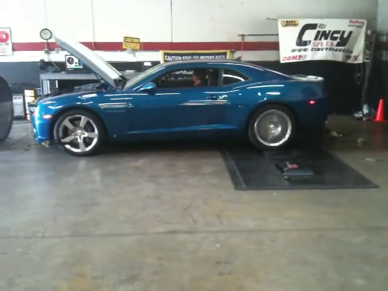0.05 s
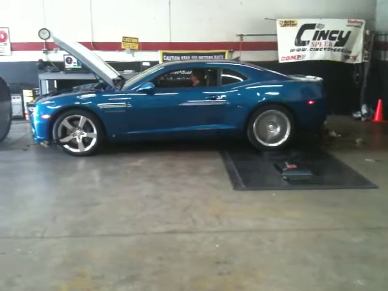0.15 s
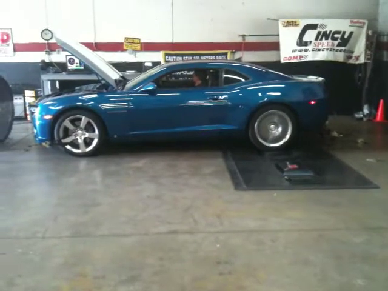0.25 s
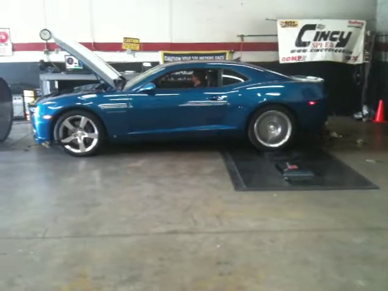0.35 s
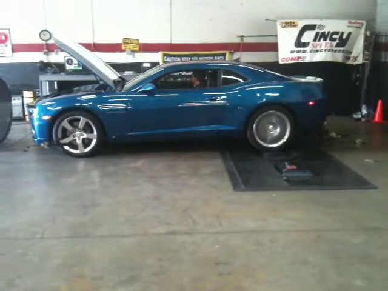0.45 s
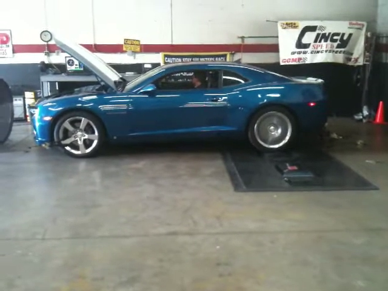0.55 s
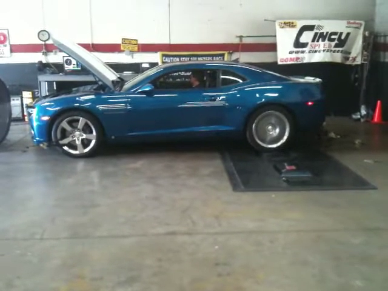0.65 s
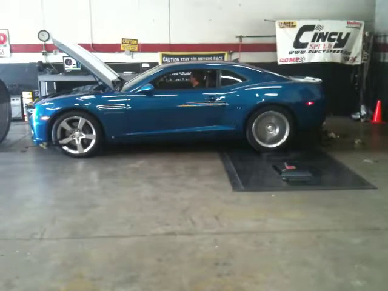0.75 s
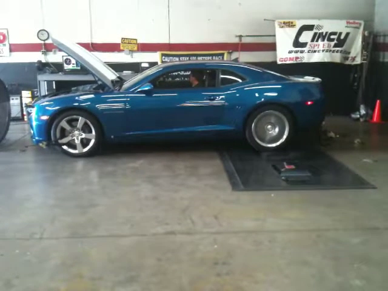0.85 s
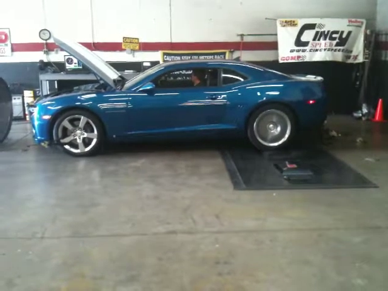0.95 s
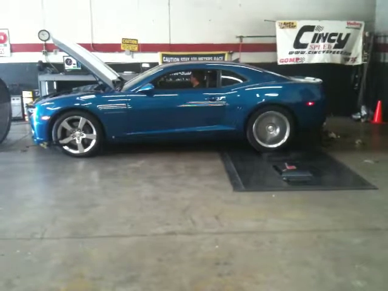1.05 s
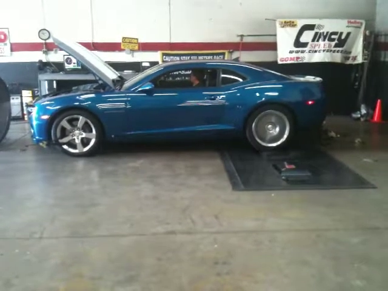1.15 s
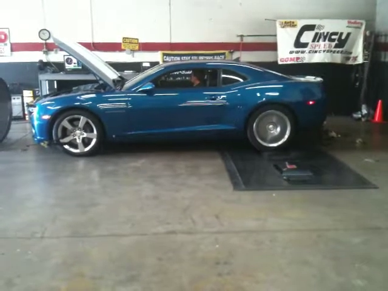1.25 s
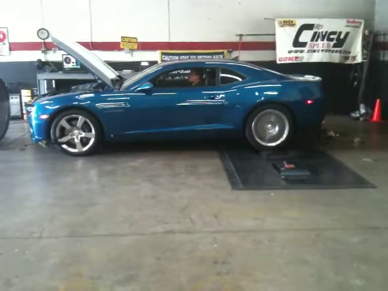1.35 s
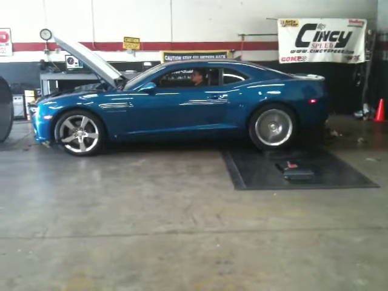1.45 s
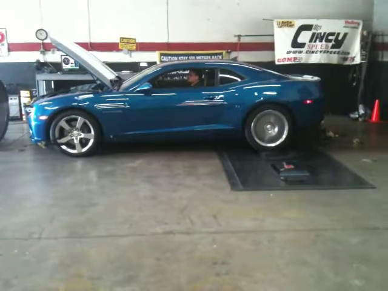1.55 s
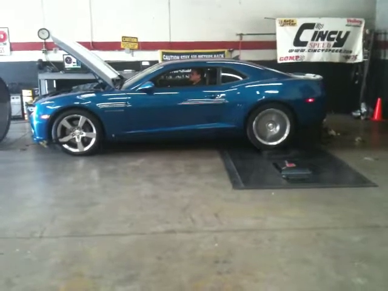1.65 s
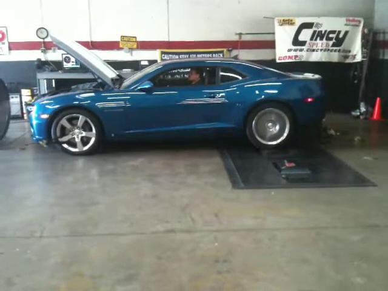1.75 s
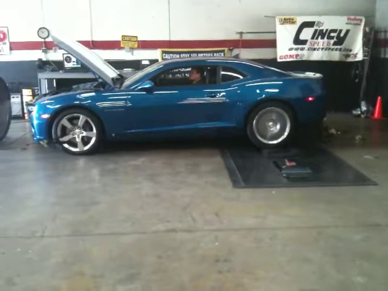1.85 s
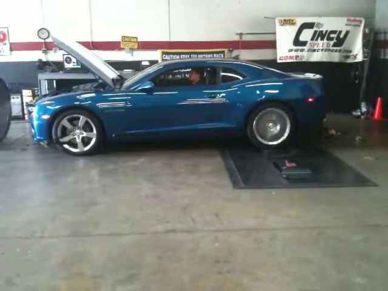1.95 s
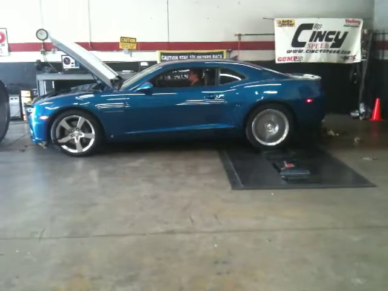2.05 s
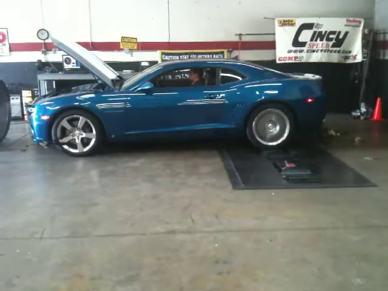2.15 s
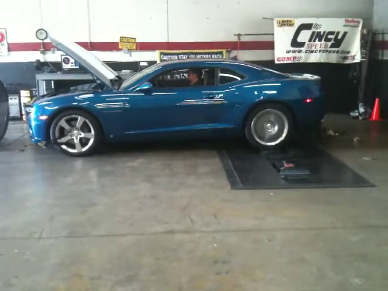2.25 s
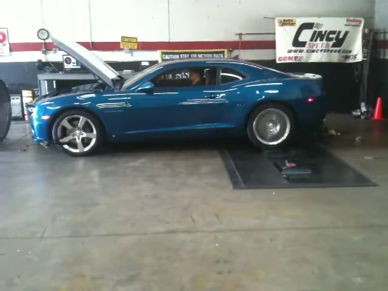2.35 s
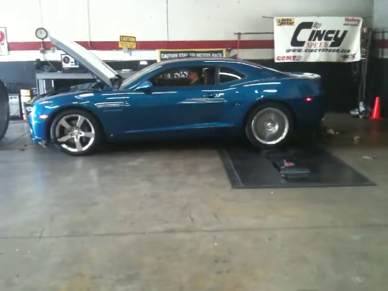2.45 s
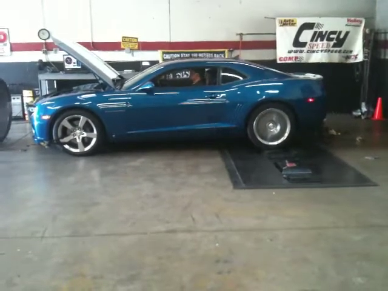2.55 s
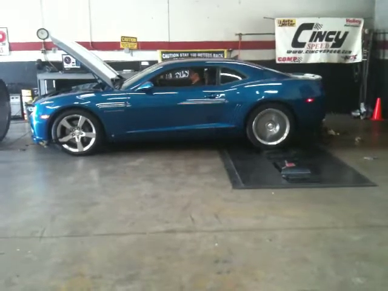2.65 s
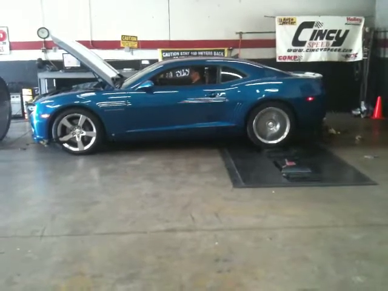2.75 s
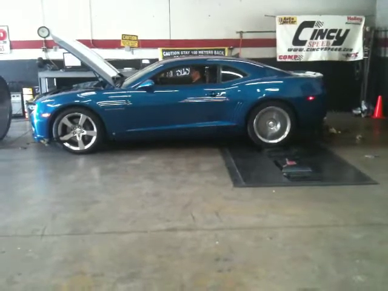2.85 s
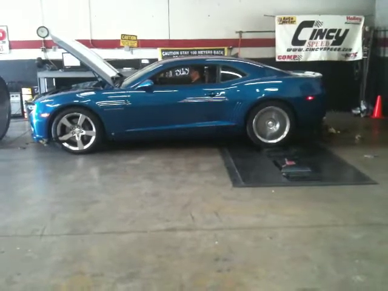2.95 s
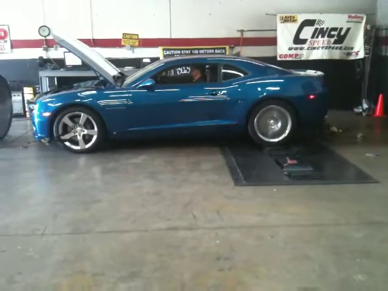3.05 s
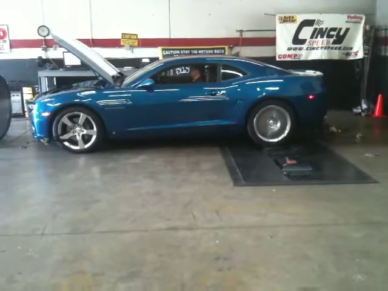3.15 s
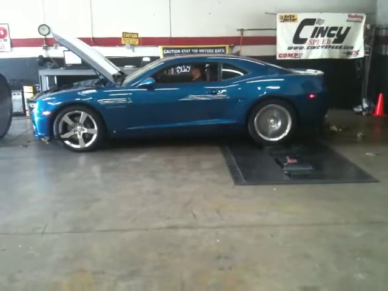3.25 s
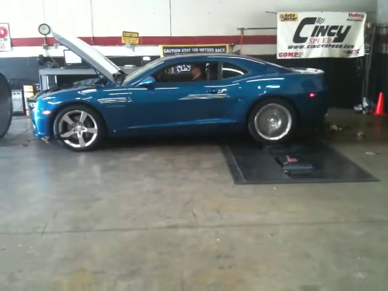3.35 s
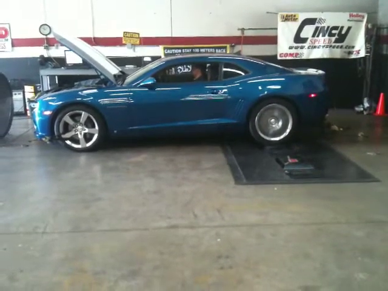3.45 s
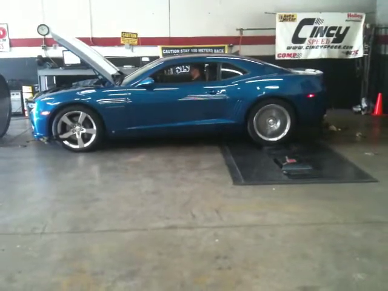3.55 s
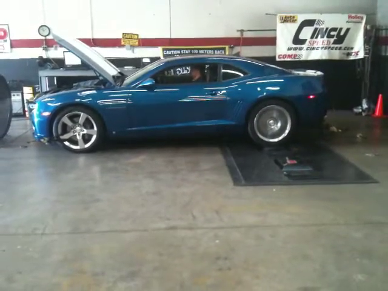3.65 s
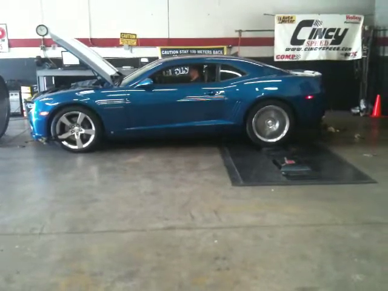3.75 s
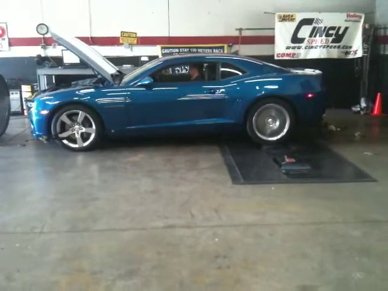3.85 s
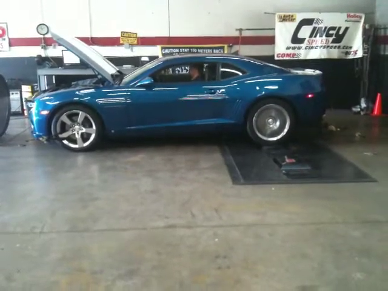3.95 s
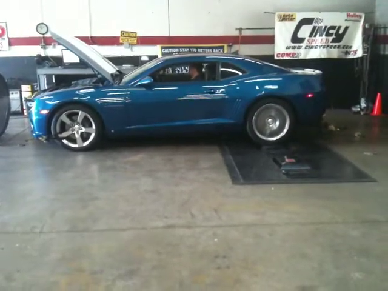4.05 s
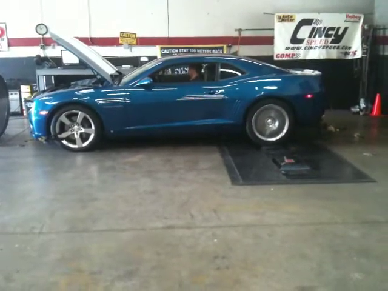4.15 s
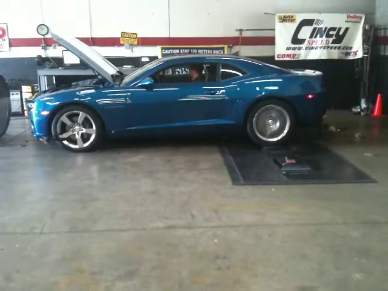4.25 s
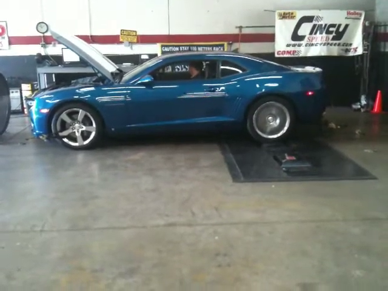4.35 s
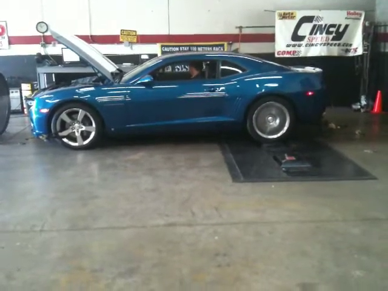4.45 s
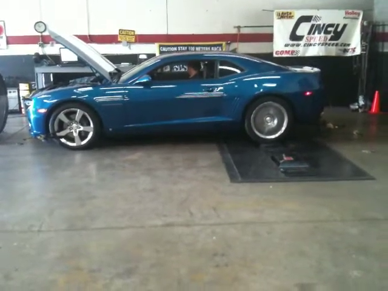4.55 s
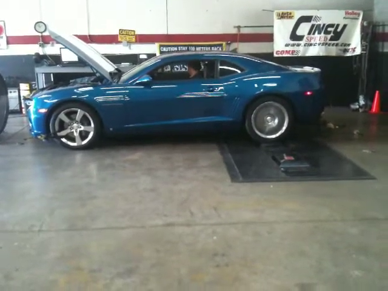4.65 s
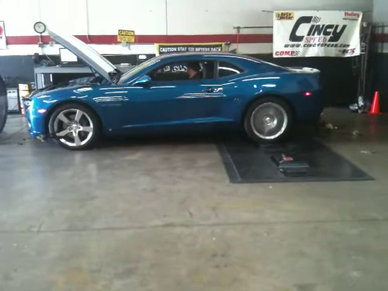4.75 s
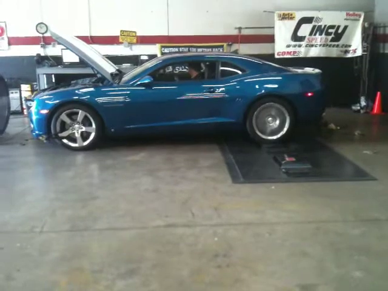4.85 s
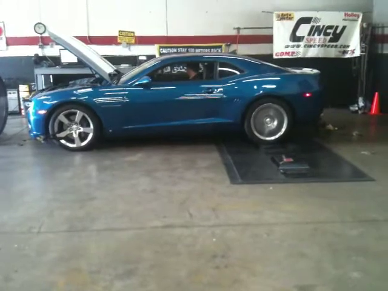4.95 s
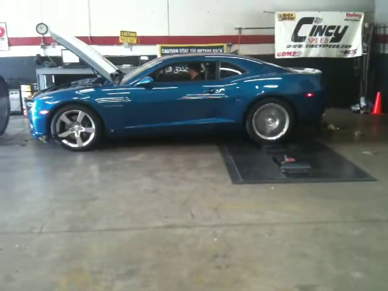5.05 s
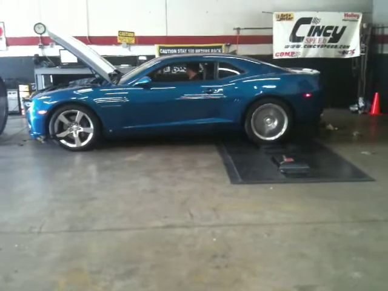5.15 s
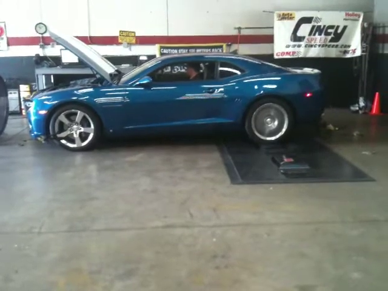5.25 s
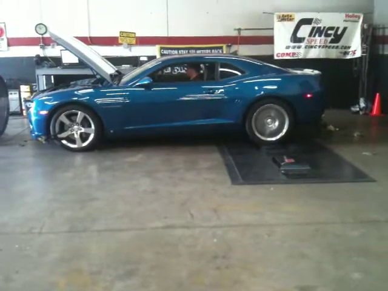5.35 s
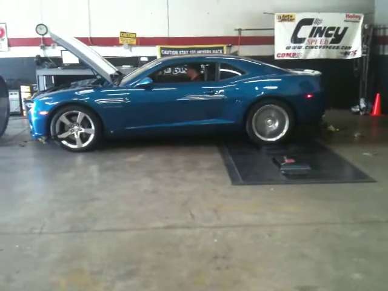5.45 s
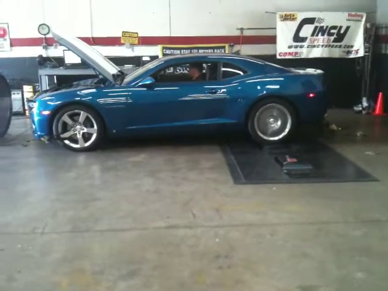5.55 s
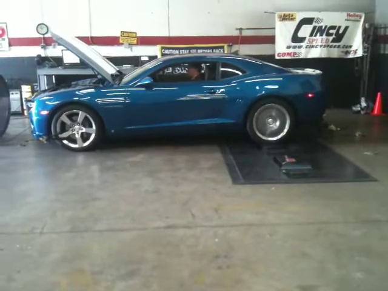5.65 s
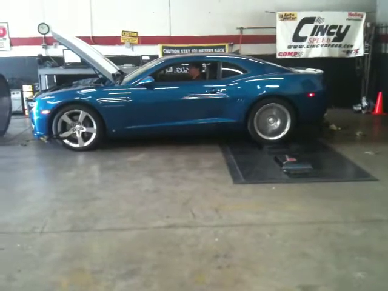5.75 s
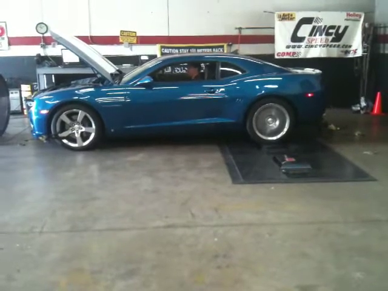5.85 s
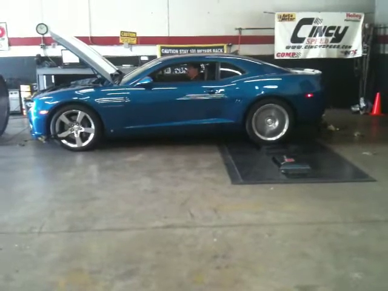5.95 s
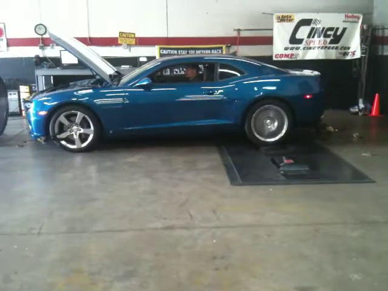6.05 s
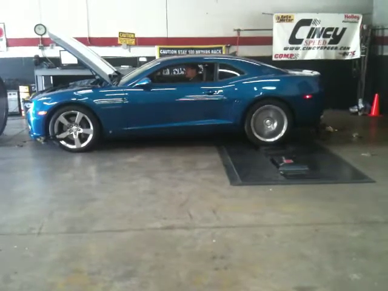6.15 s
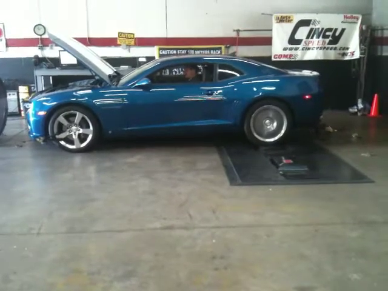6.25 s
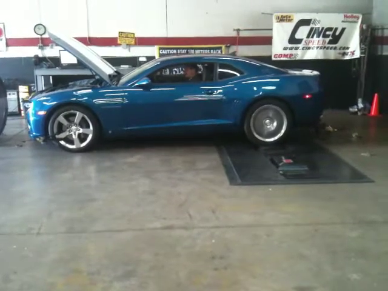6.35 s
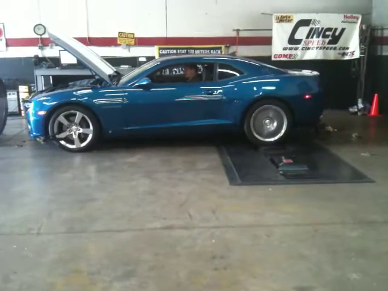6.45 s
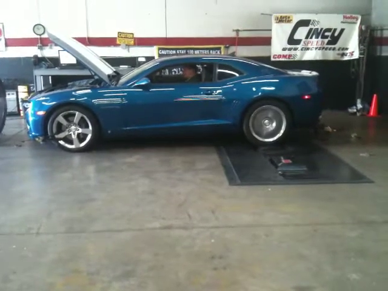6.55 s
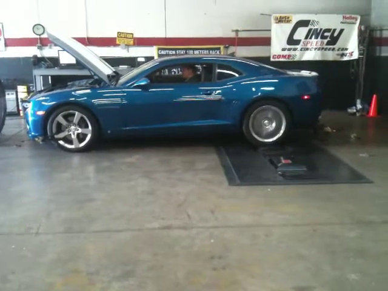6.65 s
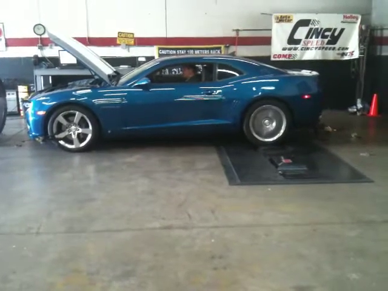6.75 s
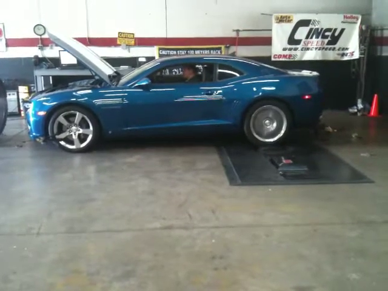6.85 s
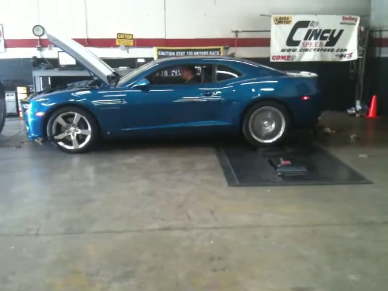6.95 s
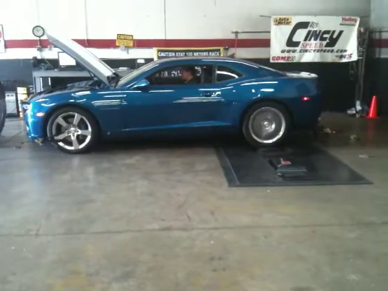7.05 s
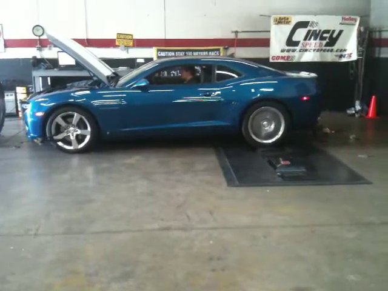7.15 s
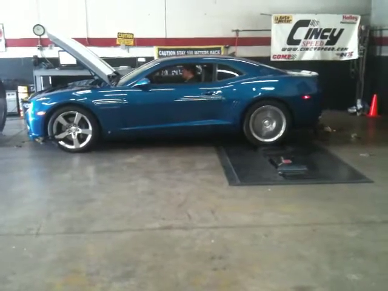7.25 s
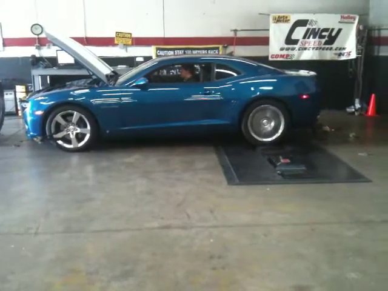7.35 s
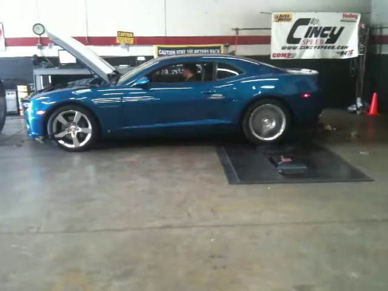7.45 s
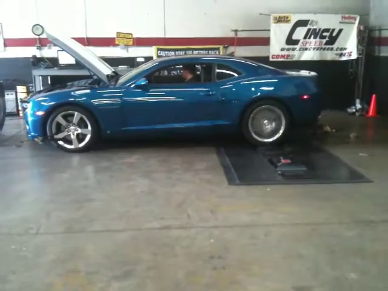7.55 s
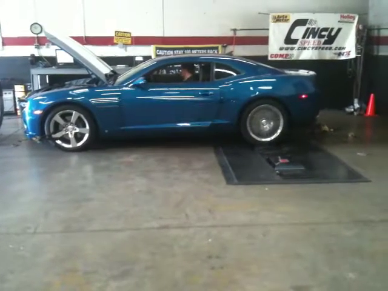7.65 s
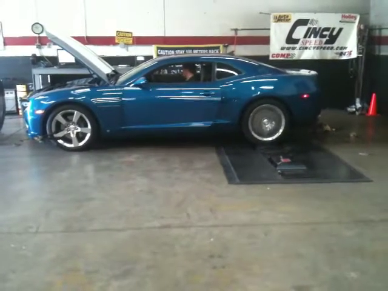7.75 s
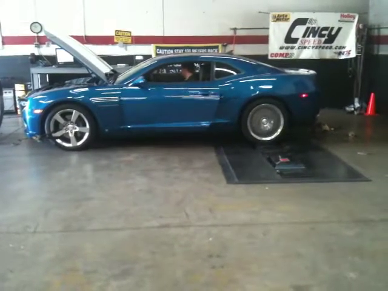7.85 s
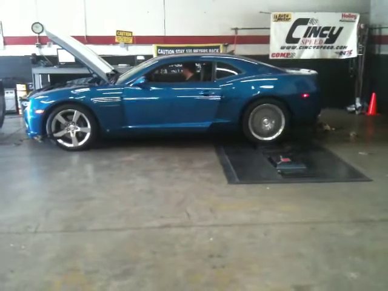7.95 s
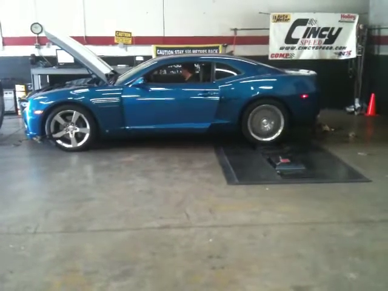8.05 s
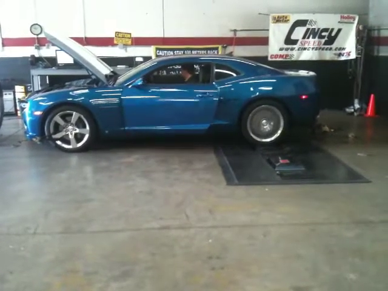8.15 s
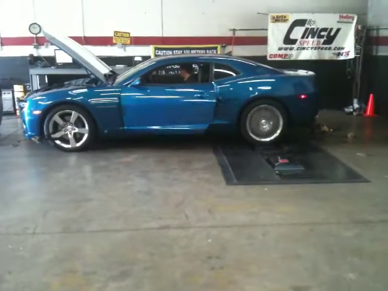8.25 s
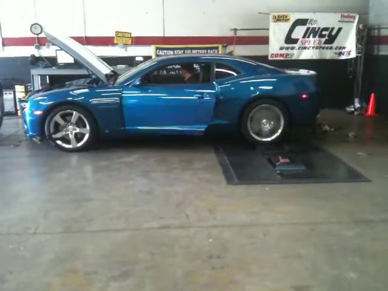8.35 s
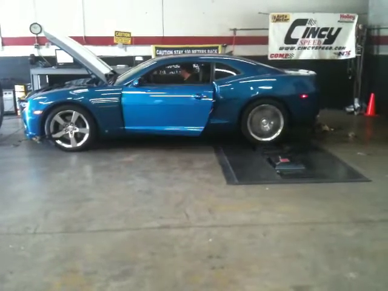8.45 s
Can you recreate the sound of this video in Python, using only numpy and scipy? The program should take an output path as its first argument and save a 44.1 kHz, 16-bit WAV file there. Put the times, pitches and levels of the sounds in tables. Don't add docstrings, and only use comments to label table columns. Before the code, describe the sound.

A V8 car roars at full revs on a workshop roller, the throttle pops shut, and whining tyres and drum slow down to a rough idle.

```python
import sys
import numpy as np
from scipy import signal
from scipy.fft import rfft, irfft, dct
from scipy.io import wavfile
from scipy.ndimage import uniform_filter1d

SR = 44100
rng = np.random.default_rng(int(sys.argv[2]) if len(sys.argv) > 2 else 0)


def rack_gain(trim_db):
    fader = np.asarray(trim_db, float)
    return 10 ** (fader / 20)


def put_to_file(sound):
    columns = np.atleast_2d(sound).T
    safe = np.clip(columns, -1, 1)
    whole_steps = np.round(safe * 32767)
    wavfile.write(sys.argv[1], SR, whole_steps.astype(np.int16))


N = 374850
TIME = np.arange(N) / SR
FULL_DRUM_HZ, FULL_CYCLE_HZ = 9000, 54


def unit(x):
    return x / np.sqrt(np.mean(x ** 2))


def curves(table):
    s, *columns = np.transpose(table)
    return [np.interp(TIME, s, c) for c in columns]


def shaped(x, gain):
    return irfft(rfft(x) * gain(np.arange(len(x) // 2 + 1) * SR / len(x) + 1), len(x))


def wander(steps):
    count = int(steps[-1]) + 2
    return np.interp(steps, np.arange(count), rng.standard_normal(count))


def resonances(f, table):
    return 1 + sum(rack_gain(db) / (1 + ((f - centre) / width) ** 2) for centre, width, db in table)


def after_shut(fall_s):
    shut_s = 1.44
    return np.exp(-np.clip(TIME - shut_s, 0, None) / fall_s)


def band(turns, hz, multiple, width):
    angle = 2 * np.pi * multiple * turns
    sound = wander(width * turns) * np.sin(angle) + wander(width * turns) * np.cos(angle)
    return unit(sound) * (multiple * hz < 17000)


def whine(turns, hz, multiple):
    tremble = 1.5 * wander(.03 * turns)
    swell = 1 + .3 * wander(90 * TIME)
    return unit(swell * np.sin(2 * np.pi * multiple * turns + tremble)) * (multiple * hz < 19000)


def shop(x):
    t60_s, tail_db = 0.97, -1.5
    t = TIME[:SR]
    low = shaped(rng.standard_normal(SR), lambda f: 1 / np.hypot(1, f / 3000))
    tail = low * rack_gain(-60 * t / t60_s)
    tail += 0.7 * rng.standard_normal(SR) * rack_gain(-60 * t / (0.47 * t60_s))
    tail *= np.clip(t / 0.0086, 0, 1)
    tail /= np.sqrt(np.sum(tail ** 2))
    lead = np.concatenate([x[SR // 2:0:-1], x])
    return x + rack_gain(tail_db) * signal.fftconvolve(lead, tail)[SR // 2:SR // 2 + N]


# (time [s], ridges passing [Hz])
DRUM = [
    (0, 8335),
    (.4, 8600),
    (1.5, 9096),
    (2.1, 9060),
    (2.4, 8850),
    (3, 8180),
    (3.4, 7700),
    (5, 5800),
    (8.5, 1419),
]


def drum():
    hz, = curves(DRUM)
    return hz, np.cumsum(hz) / SR


# (time [s], four-stroke cycle [Hz])
CYCLE = [(0, 50.4), (.35, 51.2), (1.38, 54.3), (1.46, 54.0), (1.65, 51.0), (2.14, 42.7), (2.69, 34.6),
         (2.92, 31.6), (3.4, 26.5), (4.36, 18.3), (4.75, 15.5), (5.1, 13.4), (5.6, 11.8), (6.5, 11),
         (8.5, 10.8)]


def engine_speed():
    return curves(CYCLE)[0]


# (frequency [Hz], level [dB per Hz])
ROAR_COLOUR = [(24, -51), (40, -33), (87, -18), (166, -6), (268, -4.5), (420, -11), (596, -6), (1230, -2),
               (1620, 2), (2300, -4.5), (2670, -1.5), (4300, 1), (7460, -4), (14300, -15.5), (15800, -18.5)]
# (level at speed [dB], drum rate under which it sinks [Hz],
# slope [dB per octave of speed], change while driven [dB], least level [dB])
ROAR_RANGES = [
    (-19, 11000, 4.5, 2.1, -48),
    (-14.5, 6560, 12, -0.5, -54),
    (-12.5, 7670, 17, -3.5, -41.5),
    (-18, 9800, 7.5, 1.3, -43),
    (-20.5, 8000, 11, -.4, -64),
]


def roar(drum_hz, turns):
    hz, db = np.transpose(ROAR_COLOUR)
    edges = [1, 900, 3500, 7500, 11500, SR]
    out, swell = 0, wander(20 * TIME)
    load = after_shut(0.22)
    revs_db = 4 * np.log2(engine_speed() / FULL_CYCLE_HZ)
    for low, high, (top_db, knee_hz, slope_db, load_db, least_db) in zip(edges, edges[1:], ROAR_RANGES):
        level_db = top_db + slope_db * np.minimum(np.log2(drum_hz / knee_hz), 0) + load_db * load
        gain = np.hypot(rack_gain(level_db + revs_db * (low == 1)), rack_gain(least_db))

        def colour(f):
            edge = np.sqrt((1 + (low / f) ** 8) * (1 + (f / high) ** 8))
            return rack_gain(np.interp(np.log(f), np.log(hz), db)) / edge

        noise = shaped(rng.standard_normal(N), colour)
        out = out + unit(noise) * gain * rack_gain(0.4 * swell + 0.72 * wander(18 * TIME))
    valley = 0
    for wave in (np.sin(2 * np.pi * .2 * turns), np.cos(2 * np.pi * .2 * turns)):
        valley = valley + 2 * wave * uniform_filter1d(uniform_filter1d(out * wave, size=90), size=90)
    return out - 0.46 * valley


# (start [s], end [s], pitch [Hz], width [Hz], level [dB])
BRAKE = [
    (1.6, 2.7, 4170, 160, -27),
    (2.3, 3.08, 5170, 200, -24),
]


def brake():
    out = 0
    for start, end, hz, width, db in BRAKE:
        held = np.clip(np.minimum((TIME - start) / .03, (end - TIME) / 0.036), 0, 1)
        out = out + held * rack_gain(db + 2.1 * wander(12 * TIME)) * band(TIME, 1, hz, width)
    return out


# (frequency [Hz], width [log Hz], gain [dB])
HORN = [(1646, 0.19, 6.5), (2570, 0.18, 3), (4200, 0.19, 4.5), (5200, 0.066, 9)]


def horn(f):
    db = sum(top * np.exp(-(np.log(f / hz) / width) ** 2) for hz, width, top in HORN)
    return rack_gain(db - 4.5) / np.hypot(1, (1000 / f) ** 2)


# (multiple of the ridge rate, level [dB])
TREAD = [(.17, -17), (.225, -6), (.245, -1.5), (.27, 0.5), (.29, -3.5), (.31, 2.5), (.335, -4), (.46, -4.5),
         (.49, -6), (.55, -10.5), (.59, -8.5), (.62, -5), (.65, -3.5), (.82, -5.5)]


def tread_song(hz, turns, load):
    level_db = -11 + 12 * np.log2(hz / FULL_DRUM_HZ) - 4.5 * load
    level_db = level_db - 20 * np.clip(4 * (1 - hz / 1800), 0, 1)
    song = sum(rack_gain(db) * band(turns, hz, k, max(.018, .045 * k)) for k, db in TREAD)
    return shaped(rack_gain(level_db) * unit(song), horn)


# (frequency [Hz], level [dB])
RIDGE_COLOUR = [(2700, -47), (3600, -42), (4800, -31), (7000, -24), (9700, -20.5), (11000, -25.5),
                (15000, -27.5), (17000, -31)]
# (multiple of the ridge rate, level under that octave [dB])
BEATS = [(1.3, -13), (1.69, -12), (1.85, -12), (2.14, -15), (2.3, -7.5), (2.45, -13)]
# (multiple of the ridge rate, level [dB])
UPPER = [(2.68, -7), (3.15, -8), (3.3, -6), (4, -8), (4.3, -10)]


def ridge_whine(hz, turns, load):
    beat_width = .1
    pitch, colour_db = np.transpose(RIDGE_COLOUR)

    def radiated(k):
        return rack_gain(np.interp(np.log(k * hz), np.log(pitch), colour_db))

    ridge = radiated(1) * whine(turns, hz, 1.005)
    octave = radiated(1.98) * whine(turns, hz, 2)
    octave = octave + sum(rack_gain(db) * radiated(k) * band(turns, hz, k, beat_width) for k, db in BEATS)
    third = whine(turns, hz, 3) * (3 * hz < 17000) * (hz / FULL_DRUM_HZ * 1.9)
    upper = third + sum(rack_gain(db) * band(turns, hz, k, beat_width) for k, db in UPPER)
    upper_db = -8 - 26.5 + 6 * np.log2(hz / 4300)
    return rack_gain(0.3 - 8.5 * load) * ridge + rack_gain(-1.35) * octave + rack_gain(upper_db) * upper


def tyres(hz, turns):
    load = after_shut(0.22)
    patchy = rack_gain(1.2 * wander(24 * TIME))
    return patchy * (tread_song(hz, turns, load) + ridge_whine(hz, turns, load))


def pop():
    pop_s, length_s, level_db = 1.4232, 0.0018, 9
    return rack_gain(level_db) * np.exp(-((TIME - pop_s) / length_s) ** 4)


# (frequency [Hz], width [Hz], gain [dB])
STANDING = [(103.4, 3.6, 2), (128, 4.1, 8.5), (156.9, 1.9, 10.5), (164.2, 2.7, 12), (208, 1.9, 2),
            (254, 1.9, 9), (282.8, 6.3, 15), (351, 13, 6), (556, 5.5, 10), (606, 20, 4.5), (620, 7.6, 8.5),
            (648, 8, 2.5), (706, 7, 13), (765, 9, 11)]


def standing(hz):
    return np.interp(TIME, TIME[::256], resonances(hz[::256], STANDING))


# (multiple of the cycle, level [dB])
PULLING = [(1, -26), (2, -18), (3, 2), (4, -8.5), (5, -5.5), (6, -16), (7, -15.5), (8, -12.5), (9, -7.5),
           (10, -5.5), (11, -7.5), (12, -2), (13, -16), (14, -12.5), (15, -10.5), (16, -8), (17, -14),
           (18, -4.5), (19, -15), (20, -10.5), (21, -16), (22, -9), (23, -8), (24, -11), (25, -11),
           (26, -6.5), (27, -26), (28, -16), (29, -10), (30, -35)]
# (multiple of the cycle, level [dB])
COASTING = [(1, -30), (2, -20), (3, -7.5), (4, -4.5), (5, -8), (6, 0.5), (7, -5.5), (8, 4.5), (9, -6.5),
            (11, -3), (13, -6.5), (16, -10.5), (20, -20), (30, -15.5)]
# (frequency [Hz], width [Hz], gain [dB])
PIPE = [(108, 12, -2), (149, 43, 9.5), (274, 47, 13.5), (352, 71, -11), (627, 97, 22.5)]
# (multiple of the cycle, under load [dB], shut [dB], slope [dB per octave of revs])
LEADING = [(3, -26, -30.5, 30), (5, -29, -36.5, 6), (8, -30.5, -28, 6), (12, -29.5, -38, 9)]


def engine():
    throttle = after_shut(0.21)
    hz = engine_speed()
    octaves = np.log2(hz / FULL_CYCLE_HZ)
    idling = np.clip((TIME - 5.6) / 0.54, 0, 1)
    pull_db, coast_db = -15, -23 + 5.5 * octaves - 7 * idling
    cycle = np.cumsum(hz * (1 + .004 * wander(20 * TIME))) / SR
    leading = {round(row[0]): row[1:] for row in LEADING}
    dying_db = 7 * np.minimum(hz - 14.5, 0)
    notes, pulling, coasting = 0, 0, 0
    for multiple, db in PULLING:
        k = round(multiple)
        wave = np.sqrt(2) * np.sin(2 * np.pi * (k * cycle + rng.random()))
        if k in leading:
            open_db, shut_db, slope_db = leading[k]
            note_db = throttle * open_db + (1 - throttle) * (shut_db + slope_db * octaves) + dying_db
            wobble_db = (1.5 + 3.9 * (1 - throttle)) * wander(9 * TIME)
            notes = notes + wave * standing(k * hz) * rack_gain(note_db + wobble_db)
            continue
        pulling = pulling + wave * standing(k * hz) * rack_gain(db + 2 * wander(4 * TIME))
        shut_db = np.interp(k, *np.transpose(COASTING))
        coasting = coasting + wave * rack_gain(shut_db + 3.5 * wander(9 * TIME))
    rung = shaped(coasting, lambda f: resonances(f, PIPE))
    puffs = np.exp(-(8 * cycle % 1) / 0.13) * rng.standard_normal(N)
    gas = shaped(puffs, lambda f: 1 / np.hypot(1, (f / 260 - 260 / f) / 0.88))
    shut = unit(rung) + rack_gain(-3.0) * unit(gas)
    return notes, rack_gain(pull_db) * throttle * unit(pulling) + rack_gain(coast_db) * (1 - throttle) * shut


def scene():
    hz, turns = drum()
    notes, exhaust = engine()
    near = shop(tyres(hz, turns) + exhaust + brake()) * rack_gain(-2.0) + roar(hz, turns)
    near = shaped(np.pad(near, (0, SR // 5)), lambda f: 1 / np.sqrt(1 + (129 / f) ** 6))[:N]
    return np.array([near + notes + pop()] * 2)


def overload(x):
    drive_db, clip, knee = 1, 0.72, 4.2
    hot = x * rack_gain(drive_db)
    return hot / (1 + np.abs(hot / clip) ** knee) ** (1 / knee)


def camera_grain(x):
    hop, offset, top_hz = 1024, 879, 15750
    step_db, follow, scatter_db = -5, .8, 2.5
    half, lead = hop // 2, 2 * hop - offset
    padded = np.pad(x, (lead, 3 * hop - (N + lead) % hop))
    blocks = padded.reshape(-1, hop)
    window = np.sin(np.pi * (np.arange(2 * hop) + .5) / (2 * hop))
    a, b, c, d = np.split(np.hstack([blocks[:-1], blocks[1:]]) * window, 4, axis=1)
    lines = dct(np.hstack([-c[:, ::-1] - d, a - b[:, ::-1]]), type=4, norm="ortho")
    hz = (np.arange(hop) + .5) * SR / (2 * hop)
    loud = np.sqrt(np.mean(lines ** 2, axis=1, keepdims=True))
    scatter = np.repeat(rng.standard_normal((len(lines), hop // 32)), 32, axis=1)
    finer_db = 20 * np.clip((13500 - hz) / 8000, 0, 1)
    step = loud ** follow * rack_gain(step_db - finer_db + scatter_db * scatter)
    y = dct(np.round(lines / step) * step * (hz < top_hz), type=4, norm="ortho")
    u, v = y[:, :half], y[:, half:]
    frames = np.hstack([v, -v[:, ::-1], -u[:, ::-1], -u]) * window
    return (frames[1:, :hop] + frames[:-1, hop:]).ravel()[lead - hop:lead - hop + N]


# (time [s], low edge [Hz], high edge [Hz], level [dB])
FLICKER = [(1.664, 13720, 15210, -32), (2.014, 7600, 9030, -28), (2.221, 7600, 8970, -17),
           (2.362, 8190, 9735, -27), (2.503, 5170, 6900, -16), (3.106, 5140, 6300, -20),
           (3.314, 13010, 14440, -33), (3.688, 4615, 5770, -20), (3.895, 5620, 6990, -27),
           (3.895, 9600, 11120, -28), (4.871, 4176, 5225, -25), (4.871, 6820, 8345, -26),
           (5.146, 4200, 5200, -26), (5.497, 5160, 6260, -29), (6.195, 4130, 5200, -36),
           (6.589, 7440, 8990, -27), (7.217, 5200, 7040, -34), (7.844, 4580, 5850, -36),
           (7.889, 5700, 6950, -41), (8.073, 4580, 5750, -43), (8.26, 4160, 5340, -45)]


def flicker():
    side = np.zeros(N)
    size = 2048
    for s, low, high, db in FLICKER:
        start = int(s * SR) - size // 2
        noise = shaped(rng.standard_normal(size), lambda f: (f > low) * (f < high))
        side[start:start + size] += unit(noise) * rack_gain(db) * signal.windows.tukey(size, .7)
    return side


def band_limit(x):
    return signal.sosfilt(signal.butter(12, 16010, fs=SR, output="sos"), x)


def record(dry):
    mid = camera_grain(overload(dry[0]))
    side = flicker()
    return band_limit(np.array([mid + side, mid - side]))


dry = scene()
out = record(dry)
put_to_file(out)
```